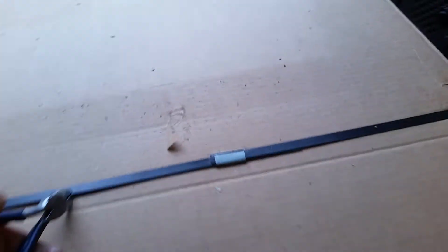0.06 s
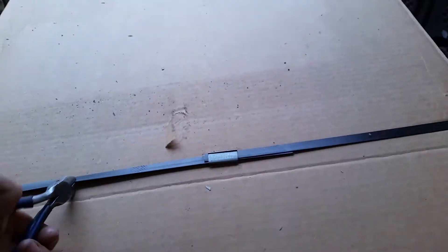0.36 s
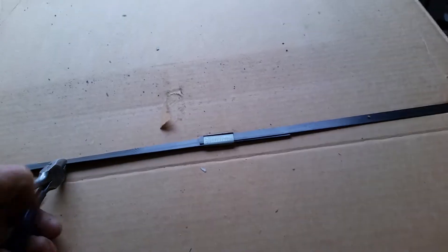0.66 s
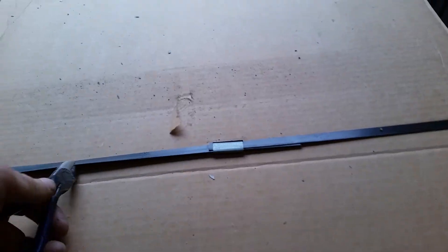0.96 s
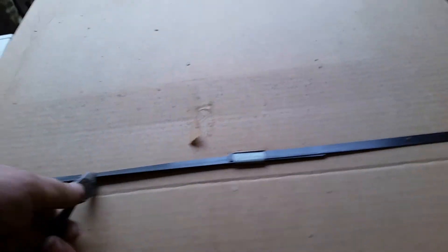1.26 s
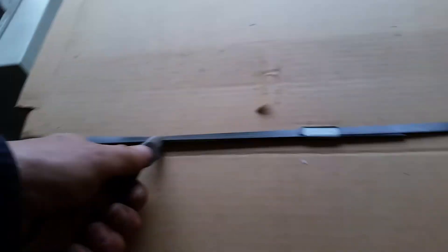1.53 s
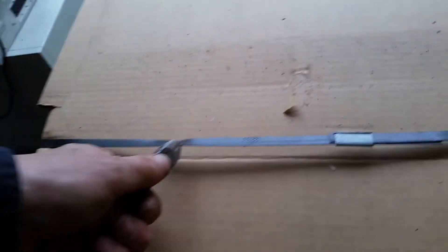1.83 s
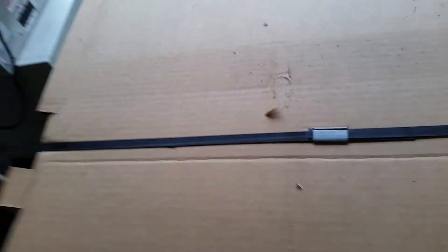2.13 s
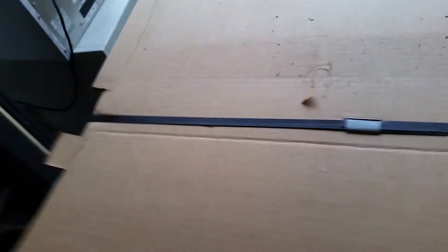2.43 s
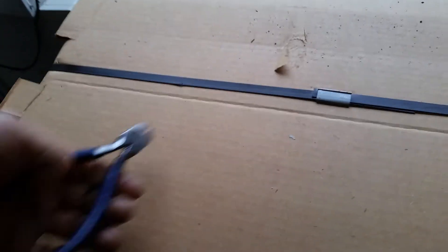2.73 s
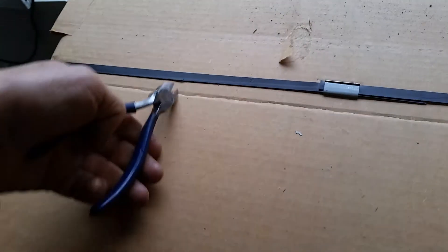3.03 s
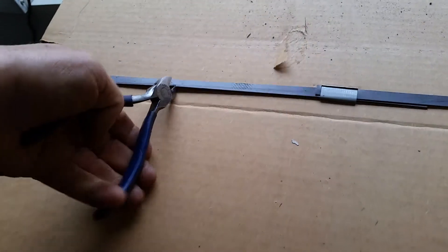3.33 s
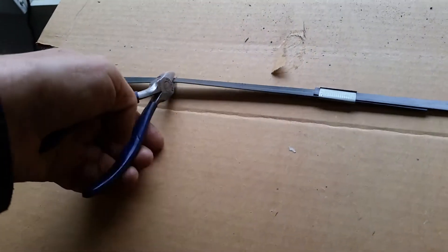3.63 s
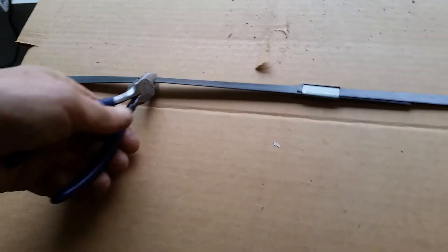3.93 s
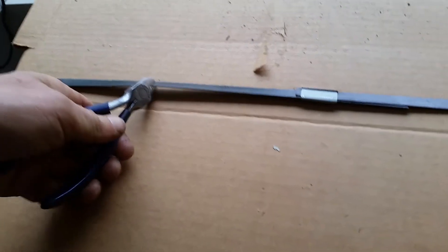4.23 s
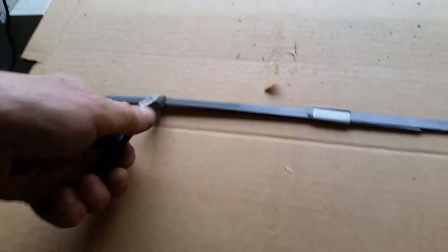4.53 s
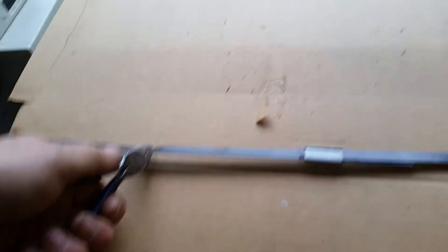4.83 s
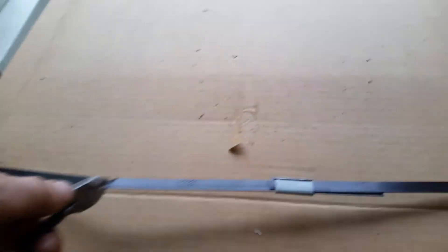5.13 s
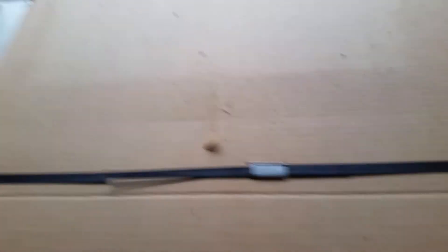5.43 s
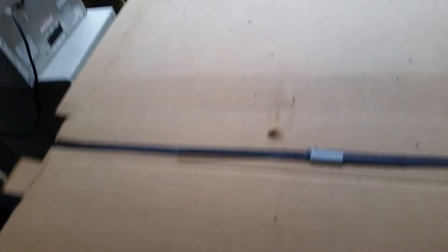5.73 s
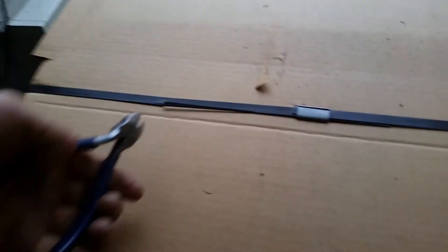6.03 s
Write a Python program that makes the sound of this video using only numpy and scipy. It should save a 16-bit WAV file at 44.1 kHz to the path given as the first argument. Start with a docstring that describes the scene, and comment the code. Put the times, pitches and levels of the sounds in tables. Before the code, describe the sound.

Small cutters scrape grittily along a taut steel strap on a cardboard box, close to the microphone, with a light tick at 0.3 seconds. Faint rasps and tool creaks follow, then dull cardboard knocks and a low thud between 1.3 and 1.9 seconds. At 2.1 seconds the strap snaps with a loud, slightly overloaded crack, rings briefly and rattles across the box, settling with a knock and thin ticks. From 3 to 5 seconds there is quiet handling: the cutters creak, the edge rasps on steel and a hand rubs and bumps the cardboard. The box thuds softly at 5 seconds, the jaws bite with sharp clicks, and at 5.4 seconds comes a second loud, ringing snap. The loose band slithers, knocks and ticks until about 6 seconds. A low workshop rumble and faint hiss lie underneath, sinking after each snap and creeping back.

```python
"""A workshop, stereo microphones close to a cardboard box: diagonal cutters work on its steel strap.
The jaws scrape, tap and nick the band, the box thuds as it is levered,
and twice the taut strap snaps and rattles away. Low room rumble lies behind it all.
The recorder overloads at each snap and turns its gain down, so its hiss sinks and creeps back."""
import sys
import numpy as np
from scipy import signal
from scipy.fft import rfft, irfft, next_fast_len
from scipy.io import wavfile
from scipy.ndimage import uniform_filter1d, minimum_filter1d

SR = 44100
rng = np.random.default_rng(int(sys.argv[2]) if len(sys.argv) > 2 else 0)


def output_pcm(signal):
    """Save a mono or channel-first signal as 16-bit PCM at the path in sys.argv[1].

    Samples are clipped to [-1, 1] before scaling.
    """
    pcm = np.clip(np.atleast_2d(signal).T, -1, 1) * 32767
    wavfile.write(sys.argv[1], SR, np.round(pcm).astype(np.int16))


N = 272049
TIME = np.arange(N) / SR
FFT_SIZE = next_fast_len(N + SR)
FREQS = np.fft.rfftfreq(FFT_SIZE, 1 / SR) + 1e-3

# the strap parts and whips the box, two cracks to a snap:
# (time [s], crack [dB], crack t60 [s], rattle [dB], steel ring [dB], box boom [dB])
STRAP_SNAPS = [(2.0980, 10, 0.072, -1.5, -13, -25.5), (2.1088, -4.5, .05, -10, -23, -31.5),
               (5.4064, 1, 0.089, -9, -26, -44), (5.4091, 12, 0.037, -1.5, -7, -17)]
# resonances of the freed band and of the box: (frequency [Hz], level [dB], t60 [s])
FREED_BAND_MODES = [(1360, 4.5, .07), (1720, -8, .1), (1820, -14, 0.13), (1990, -7, 0.27), (2144, -12, .12),
                    (2502, -6.5, .12), (2734, -5.5, .11), (4400, -13.5, 0.063), (13000, -3, .11),
                    (14700, -8.5, .12), (15300, -5, .11), (14980, -1, .11), (15800, -7, .1)]
CARDBOARD_MODES = [(63.6, -4, .28), (113.34, -8.5, 0.49), (202, -5.5, 0.2), (227.5, -1, 0.15),
                   (363, -8.5, 0.25), (421.5, -2, .26), (460, -2, 0.17), (667, 3.5, 0.34), (816, -1, 0.21)]
# spectra of the tearing steel and of its rattle: (frequency [Hz], level [dB])
CRACK_SPECTRUM = [(30, -15), (90, -5), (190, -6), (310, -8.5), (450, -7.5), (600, -5.5), (800, -0.5),
                  (1050, -0.5), (1400, 4.5), (1950, 3.5), (2600, -5), (5000, -1.5), (9000, -2.5),
                  (15000, -5)]
RATTLE_SPECTRUM = [(60, -4.5), (120, -2.5), (220, -5), (300, -7), (410, 1.5), (580, 2), (780, 1.5),
                   (1100, -6), (1500, -9.5), (2050, 6), (3000, -2), (4500, -12.5), (9000, -2.5),
                   (15000, -11)]


def strap_snaps(tear_s=0.00083, rattle_t60=0.32, slap_delay_s=0.0036):
    """Close to the microphones the band tears through, rings, booms on the box and rattles across it."""
    crack, rattle = np.zeros((2, N))
    for start, crack_db, crack_t60, rattle_db, _, _ in STRAP_SNAPS:
        tear = np.clip((TIME - start) / tear_s, 0, 1)
        crack += from_db(crack_db) * tear * dying(TIME - start, crack_t60)
        rattle += from_db(rattle_db) * tear * dying(TIME - start, rattle_t60)
    times, _, _, _, steel_db, boom_db = np.transpose(STRAP_SNAPS)
    landings = times + slap_delay_s
    steel = ring(clicks(landings, from_db(steel_db)), FREED_BAND_MODES) * from_db([[0], [-2]])
    boom = ring(clicks(landings, from_db(boom_db)), CARDBOARD_MODES)
    # the crack sounds unrelated in the left and right microphones
    burst = coloured(crack * rng.standard_normal((2, N)), CRACK_SPECTRUM) * from_db([[-.5], [1.5]])
    chatter = coloured(rattle * grains(per_s=800, spread_db=4, t60=.0081), RATTLE_SPECTRUM)
    return workshop(burst + chatter + steel, wet_db=-5) + boom


# the jaws or the loose strap end tick on steel: (time [s], level [dB], hardness [0-1])
STEEL_TICKS = [(0.268, -9.5, 0), (2.349, -5, .05), (2.442, -3, .05), (3.717, -19, 0.24), (5.003, -29, .1),
               (5.115, -23.5, .1), (5.204, -21.5, .1), (5.222, 2, 0.55), (5.233, -9, .1),
               (5.2772, -0.5, 0.85), (5.668, -7, 0.02), (5.796, -1, 0), (5.842, -4.5, 0.16)]
# resonances of the band while still taut: (frequency [Hz], level [dB], t60 [s])
TAUT_BAND_MODES = [(457, -18, 0.29), (650, -13, .25), (1322, -3.5, 0.17), (1346, 5.5, 0.12),
                   (1900, 1.5, 0.099), (2520, -1.5, .11), (3250, -13, .15)]
# spectra of a light touch and of a hard bite: (frequency [Hz], level [dB])
TICK_SPECTRUM = [(100, -30), (800, -26.5), (2500, -18), (5000, -13), (9000, -7.5), (13000, 9.5)]
BITE_SPECTRUM = [(100, -17), (500, -9), (1400, -3.5), (2800, 15.5), (5000, 8), (7000, 13), (10000, 8.5),
                 (14000, -10.5)]


def steel_ticks(ring_db=-31, body_db=-52):
    """Light contacts are all treble; hard bites also crack lower, ring the band and stir the box."""
    times, db, hardness = np.transpose(STEEL_TICKS)
    touches = clicks(times, from_db(db))
    bites = clicks(times, from_db(db) * hardness ** 2)
    tick = coloured(contacts(touches, t60=.009), TICK_SPECTRUM)
    crack = coloured(contacts(bites, t60=.011), BITE_SPECTRUM)
    band = from_db(ring_db) * ring(bites, TAUT_BAND_MODES)
    body = from_db(body_db) * ring(bites, CARDBOARD_MODES)
    return workshop(tick + band, wet_db=-7) + workshop(crack, wet_db=-5.5) + body


# tool and strap knock on the cardboard: (time [s], level [dB])
BOX_KNOCKS = [(1.2829, 1), (1.381, 4.5), (1.393, -1), (1.481, -5), (1.805, -1), (1.828, -2), (2.269, -5.5),
              (2.296, 9.5), (2.535, -11), (2.952, -0.5), (3.798, -2), (4.307, -7), (4.931, -13.5),
              (5.026, -11), (5.665, 4.5)]
# spectrum of a dull knock: (frequency [Hz], level [dB])
KNOCK_SPECTRUM = [(60, -12.5), (200, -2), (450, 5.5), (750, -0.5), (1100, 1.5), (1700, -11), (3000, -14),
                  (8000, -29.5), (16000, -42.5)]
# the box panel gives under the levering hand: (time [s], level [dB])
PANEL_THUDS = [(1.799, -34.5), (1.817, -28), (1.892, -35.5), (2.952, -33), (5.027, -32.5), (5.039, -30),
               (5.078, -37), (5.117, -38.5)]
# resonances of that panel: (frequency [Hz], level [dB], t60 [s])
BOX_PANEL_MODES = [(61, 7, 0.18), (86, -6.5, 0.2), (119, -3, 0.16), (177, -15, 0.12)]
# the freed band slaps the box, pitched by where it lands: (time [s], frequency [Hz], level [dB])
BAND_SLAPS = [(2.103, 83.13, -14.5), (5.409, 216.4, -10.5)]


def box_impacts(slap_t60=.06):
    """Dead knocks on the cardboard, the low thud of its flexing panel and the slap of the freed band."""
    times, db = np.transpose(BOX_KNOCKS)
    knocks = contacts(clicks(times, from_db(db)), t60=.015)
    times, db = np.transpose(PANEL_THUDS)
    thuds = ring(clicks(times, from_db(db)), BOX_PANEL_MODES)
    slaps = sum(ring(clicks([start], 1), [(hz, db, slap_t60)]) for start, hz, db in BAND_SLAPS)
    return workshop(coloured(knocks, KNOCK_SPECTRUM), wet_db=-9) + thuds + slaps


# the jaws drag along the band: (start [s], length [s], level [dB])
JAW_DRAGS = [(-.1, 0.69, -39), (.345, 0.17, -16), (1.36, 0.041, -29.5), (1.785, .05, -30.5)]
# spectrum of a drag: (frequency [Hz], level [dB])
DRAG_SPECTRUM = [(60, -9), (250, -14), (480, -4.5), (720, 1.5), (1100, -5), (1550, -5.5), (2100, 7.5),
                 (3000, -3), (4500, -12.5), (8000, -11.5), (15000, -21.5)]


def jaw_scrapes():
    """The jaws stick and slip along the painted steel."""
    slips = strokes(JAW_DRAGS, edge_share=.42) * grains(per_s=2000, spread_db=2.5, t60=.009)
    return workshop(coloured(slips, DRAG_SPECTRUM), wet_db=-10)


# short light strokes of a cutting edge: (start [s], length [s], level [dB])
EDGE_STROKES = [(0.233, 0.13, -37), (0.75, 0.064, -34), (0.864, 0.088, -31.5), (0.978, 0.085, -34.5),
                (1.03, 0.095, -34), (1.144, 0.042, -31), (1.255, 0.081, -41.5), (3.444, 0.14, -37.5),
                (3.61, 0.13, -32.5), (4.581, 0.053, -35), (4.649, 0.045, -39.5), (4.687, 0.19, -43),
                (5.76, 0.068, -42)]
# spectrum of the edge on steel: (frequency [Hz], level [dB])
RASP_SPECTRUM = [(300, -13), (900, -11), (1400, -1.5), (2100, 3.5), (3000, -14.5), (7000, -40),
                 (11000, -12), (14000, -1)]


def edge_rasps():
    """The cutting edge hisses over the steel with fine stick and slip."""
    slips = strokes(EDGE_STROKES, edge_share=.51) * grains(per_s=1900, spread_db=2.5, t60=.008)
    return workshop(coloured(slips, RASP_SPECTRUM), wet_db=-9)


# the jaws are set on, the band is levered up, it parts:
# (grip time [s], lever time [s], parting time [s], peak strain grit [dB], slither [dB])
STRAP_CUTS = [(0, 1.79, 2.098, -39.5, -33.5), (2.95, 5.025, 5.406, -54.5, -32)]


def cut_phases(grip_db=-41, heave_db=-36, heave_t60=2.7, strain_db_per_s=44.5,
               settle_s=0.31, slither_t60=1.0):
    """Envelopes: the hand grips, the band drags on the box, strains until it parts, slithers to rest."""
    grip, heave, strain, slither = np.zeros((4, N))
    for grip_s, lever_s, part_s, strain_db, slither_db in STRAP_CUTS:
        since_parting = TIME - part_s
        uncut = TIME < part_s
        grip += uncut * (TIME >= grip_s) * from_db(grip_db)
        heave += uncut * from_db(heave_db) * dying(TIME - lever_s, heave_t60)
        tension = from_db(strain_db - strain_db_per_s * np.abs(since_parting))
        strain += uncut * (TIME >= lever_s) * tension
        falling = np.clip(since_parting / settle_s, 0, 1) ** 2
        resting = dying(np.maximum(since_parting - settle_s, 0), slither_t60)
        slither += from_db(slither_db) * falling * resting
    return grip, heave, strain, slither


# hand and tool slide over the box: (start [s], length [s], rub [dB], grit [dB])
BOX_SLIDES = [(-.15, 0.32, -34, -31), (0.073, 0.44, -36, -34.5), (0.332, 0.18, -58, -23.5),
              (0.442, 0.31, -39, -41), (1.312, 0.18, -39, -51), (2.95, .36, -43.5, -44),
              (3.216, 0.4, -43, -52.5), (3.61, 0.17, -43, -46.5), (3.987, 0.12, -47.5, -56),
              (4.404, 0.53, -55.5, -47)]
# spectra of rubbed cardboard and of gritty metal: (frequency [Hz], level [dB])
RUB_SPECTRUM = [(40, 6.5), (130, 1), (300, 1), (750, 7), (1100, -2.5), (1900, 1.5), (3000, -9),
                (6000, -22.5), (12000, -34.5)]
GRIT_SPECTRUM = [(500, -38.5), (5000, -23), (10000, -6.5), (12500, -1), (16000, -4.5)]


def sliding(heave, strain, slither):
    """Soft rubbing on cardboard and fine grit on metal; the loose band ticks and sways the box."""
    slides = np.array(BOX_SLIDES)
    rub_level = strokes(slides[:, [0, 1, 2]], edge_share=.35) + heave + slither
    grit_level = strokes(slides[:, [0, 1, 3]], edge_share=.55) + strain + from_db(-5) * slither
    rub = rub_level * grains(per_s=900, spread_db=3, t60=.025)
    grit = grit_level * grains(per_s=800, spread_db=3.5, t60=.014)
    loose_ticks = from_db(-7) * slither * grains(per_s=35, spread_db=3, t60=.008)
    sway = from_db(-35) * ring(slither * rng.standard_normal(N), BOX_PANEL_MODES)
    metal = workshop(coloured(grit + loose_ticks, GRIT_SPECTRUM), wet_db=-6.5)
    return coloured(rub, RUB_SPECTRUM) + metal + sway


# the cutters open or close: (start [s], length [s], level [dB])
CUTTER_CREAKS = [(.87, 0.11, -30), (.98, 0.23, -39.5), (1.37, 0.051, -26.5), (2.945, 0.12, -24),
                 (3.07, 0.1, -30), (3.63, 0.13, -31.5), (4.0, 0.14, -36.5), (4.495, 0.024, -28.5),
                 (4.69, 0.094, -30.5)]
# spectra of the creak and of the hand on the handles: (frequency [Hz], level [dB])
CREAK_SPECTRUM = [(300, -24.5), (900, -16.5), (1300, 0), (1550, 2), (2000, -6.5), (2700, -27), (6000, -26),
                  (13500, -22)]
CHAFE_SPECTRUM = [(300, -15.5), (700, -11), (1100, -12.5), (1500, 4.5), (2000, -2.5), (2500, -13.5),
                  (3200, -4.5), (6000, -25), (13500, -26.5)]


def cutters_in_hand(grip):
    """Close and dry: the cutters creak as they move, and the gripping hand chafes steadily."""
    creak = strokes(CUTTER_CREAKS, edge_share=.353) * grains(per_s=250, spread_db=.5, t60=.032)
    return coloured(creak, CREAK_SPECTRUM) + coloured(grip * diffuse(), CHAFE_SPECTRUM)


# colour of the sound coming back off the walls: (frequency [Hz], gain [dB])
WALL_RESPONSE = [(60, 3), (300, -3), (2200, -4), (4500, -8), (14000, -0.5)]


def workshop(direct, wet_db, t60=0.46, build_s=0.016):
    """Direct sound plus a diffuse tail that builds up after the first wall echoes."""
    tail = diffuse() * dying(TIME, t60) * np.clip(TIME / build_s, 0, 1) ** 2
    tail = coloured(tail / np.sqrt(np.sum(tail ** 2) / 2), WALL_RESPONSE)
    reverb = irfft(rfft(direct, FFT_SIZE) * rfft(tail, FFT_SIZE), FFT_SIZE)[:, :N]
    return direct + from_db(wet_db) * reverb


# the workshop at rest: (frequency [Hz], level [dB])
RUMBLE_SPECTRUM = [(20, 5.5), (70, 6), (140, 4), (240, -2), (330, -12.5), (750, -16), (1200, -15.5),
                   (3000, -28), (8000, -42.5)]


def room_tone(hum_hz=242.3, hum_db=-62.5):
    """Low rumble all round the microphones, with a faint hum."""
    rumble = from_db(-40.5) * coloured(diffuse(), RUMBLE_SPECTRUM)
    return rumble + from_db(hum_db) * np.sin(2 * np.pi * hum_hz * TIME)


# how alike the two microphones hear the room: (frequency [Hz], correlation [0-1])
MIC_LIKENESS = [(50, .9), (140, 0.75), (450, 0.38), (900, .3), (1600, 0), (5000, 0.031)]


def diffuse():
    """White stereo noise, alike in the bass and unrelated in the treble."""
    mid, side = rfft(rng.standard_normal((2, FFT_SIZE)))
    alike = over_hz(MIC_LIKENESS)
    left_right = np.sqrt((1 + alike) / 2) * mid + np.sqrt((1 - alike) / 2) * side * [[1], [-1]]
    return irfft(left_right, FFT_SIZE)[:, :N]


def strokes(rows, edge_share):
    """Each stroke takes hold, slides and lets go; an edge lasts a share of its length."""
    pressure = np.zeros(N)
    for start, length, db in rows:
        along = (TIME - start) / length
        pressure += from_db(db) * np.clip(np.minimum(along, 1 - along) / edge_share, 0, 1)
    return pressure


def clicks(times, gains):
    """One impulse for each contact."""
    impulses = np.zeros(N)
    impulses[(np.asarray(times) * SR).astype(int)] = gains
    return impulses


def contacts(impulses, t60):
    """Each impulse spreads into a brief noise burst of the same energy."""
    decay = dying(1 / SR, t60) ** 2
    power = signal.lfilter([1 - decay], [1, -decay], impulses ** 2 + 1e-18)
    return np.sqrt(power) * diffuse()


def grains(per_s, spread_db, t60):
    """Random slips of uneven size; rms 1."""
    slipping = rng.random(N) < per_s / SR
    slips = slipping * from_db(spread_db * np.clip(rng.standard_normal(N), -2, 2))
    return contacts(slips / np.std(slips), t60)


def ring(impulses, modes):
    """Impulses set a body's decaying sines going."""
    sound = np.zeros(N)
    for hz, db, t60 in modes:
        decay, angle = dying(1 / SR, t60), 2 * np.pi * hz / SR
        feedback = [1, -2 * decay * np.cos(angle), decay ** 2]
        sound += from_db(db) * signal.lfilter([0, np.sin(angle)], feedback, impulses + 1e-18)
    return sound


def from_db(db):
    """Decibels to gain."""
    return 10 ** (np.asarray(db) / 20)


def dying(t, t60):
    """Zero before t = 0, then 60 dB down every t60."""
    return (t >= 0) * np.exp(-np.log(1000) * np.maximum(t, 0) / t60)


def over_hz(points, column=1):
    """One column of a spectrum at every frequency."""
    table = np.array(points)
    return np.interp(np.log(FREQS), np.log(table[:, 0]), table[:, column])


def coloured(x, points, column=1):
    """Minimum-phase filter: nothing sounds before its cause."""
    cepstrum = irfft(np.log(from_db(over_hz(points, column))), FFT_SIZE)
    cepstrum[1:FFT_SIZE // 2] *= 2
    cepstrum[FFT_SIZE // 2 + 1:] = 0
    return irfft(rfft(x, FFT_SIZE) * np.exp(rfft(cepstrum)), FFT_SIZE)[..., :N]


def each_side(x, points):
    """Left and right through their own responses."""
    return np.array([coloured(x[0], points, column=1), coloured(x[1], points, column=2)])


def scene():
    """All that reaches the microphones, from the strap close by to the room behind."""
    grip, heave, strain, slither = cut_phases()
    impacts = strap_snaps() + steel_ticks() + box_impacts()
    friction = jaw_scrapes() + edge_rasps() + sliding(heave, strain, slither) + cutters_in_hand(grip)
    return impacts + friction + room_tone()


def gain_control(x, threshold_db=-33, depth_db=24, hold_s=0.82, release_db_per_s=48, smooth_s=0.18):
    """Loud sharp sounds pull the recorder's gain down; it is held, then creeps back."""
    treble = np.diff(x, prepend=0)
    power = uniform_filter1d(np.mean(treble ** 2, axis=0) / 2, size=441)   # over 10 ms
    over_db = np.clip(10 * np.log10(np.abs(power) + 1e-12) - threshold_db, 0, depth_db)
    half_hold = int(hold_s * SR / 2)
    held_db = -minimum_filter1d(-over_db, 2 * half_hold + 1, origin=half_hold, mode="constant")
    recovery_db = release_db_per_s * TIME
    cut_db = np.maximum.accumulate(held_db + recovery_db) - recovery_db
    lag = np.exp(-1 / (smooth_s * SR))
    return x * from_db(-signal.lfilter([1 - lag], [1, -lag], cut_db))


# microphone ports, hollow at 8 kHz and ringing at 14 kHz: (frequency [Hz], left [dB], right [dB])
MIC_PORTS = [(20, -5.5, -1.5), (93, 7, 2), (406.3, 6, 1), (1020, -1, -12), (1900, -3.5, -11),
             (4600, -5.5, -13), (6020, -17.5, -27.5), (8440, -38, -36.5), (11600, -17.5, -10),
             (13650, -7.5, 1.5), (16000, -13, -6)]
# the recorder's electronic hiss: (frequency [Hz], left [dB], right [dB])
HISS_SPECTRUM = [(100, -7.5, -23.5), (1188, -16, -22), (1430, -10.5, -30), (1990, -17, -27),
                 (2550, -30.5, -34), (3010, -13.5, -34), (3555, -16.5, -35.5), (4255, 1.5, -33.5),
                 (4730, 0.5, -32.5), (5540, -16.5, -37), (6400, -26.5, -41), (7300, -60.5, -75),
                 (14700, -37.5, -25)]


def record(dry, cutoff_hz=15950):
    """Through the microphone ports into the recorder: hiss, gain control, overload and the top cut."""
    hiss = from_db(-33) * each_side(rng.standard_normal((2, N)), HISS_SPECTRUM)
    picked_up = each_side(dry, MIC_PORTS) + hiss
    clipped = np.clip(gain_control(picked_up), -1, 1)
    top_cut = signal.ellip(10, .1, 70, cutoff_hz, fs=SR, output="sos")
    return signal.sosfilt(top_cut, clipped)


dry = scene()
out = record(dry)
output_pcm(out)
```